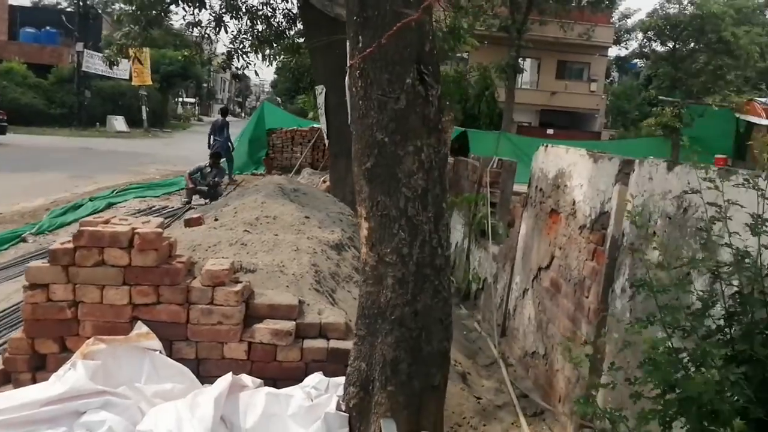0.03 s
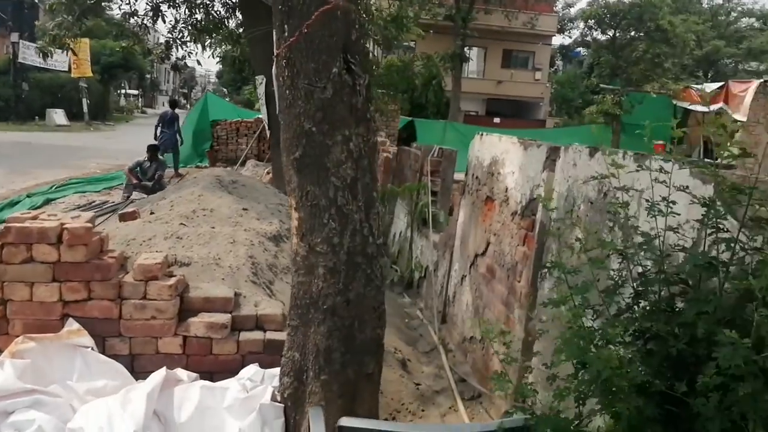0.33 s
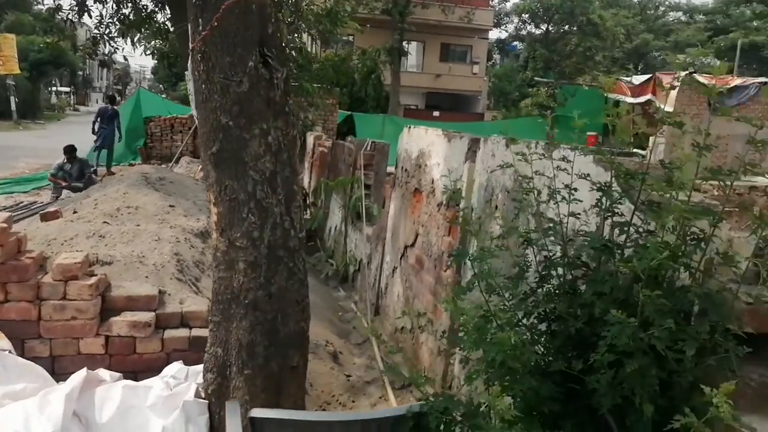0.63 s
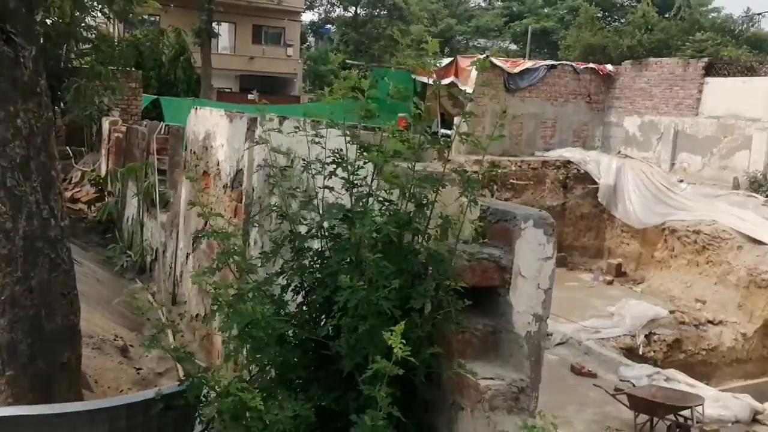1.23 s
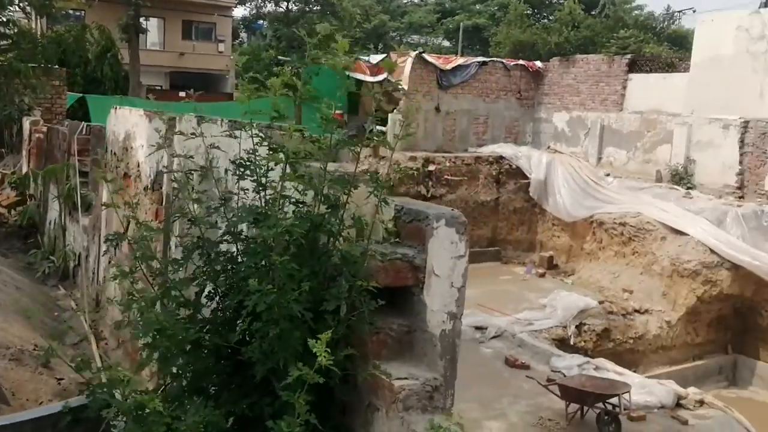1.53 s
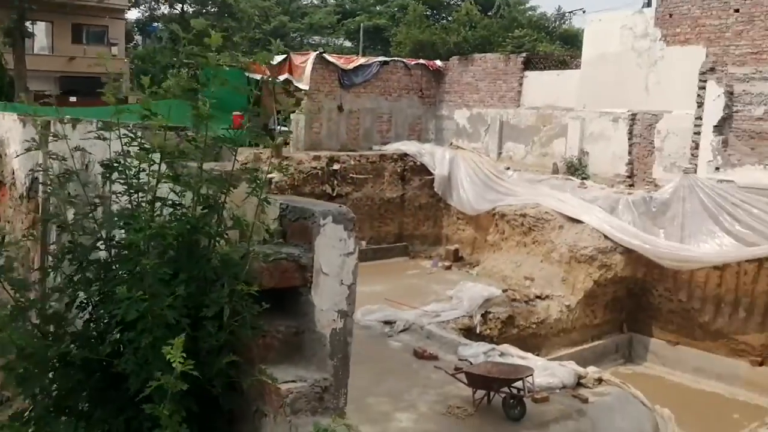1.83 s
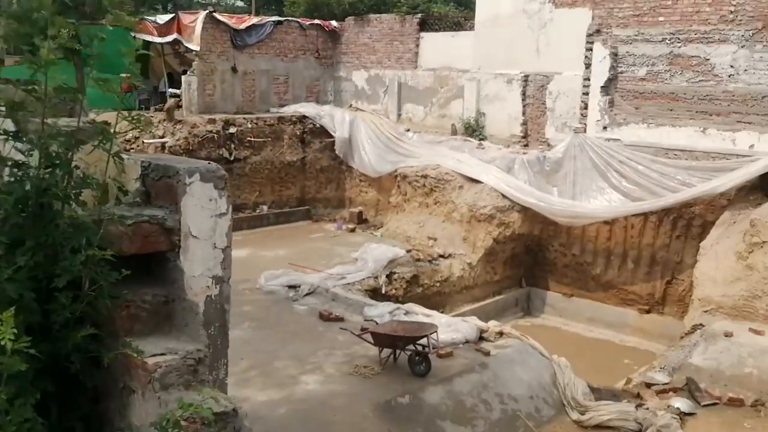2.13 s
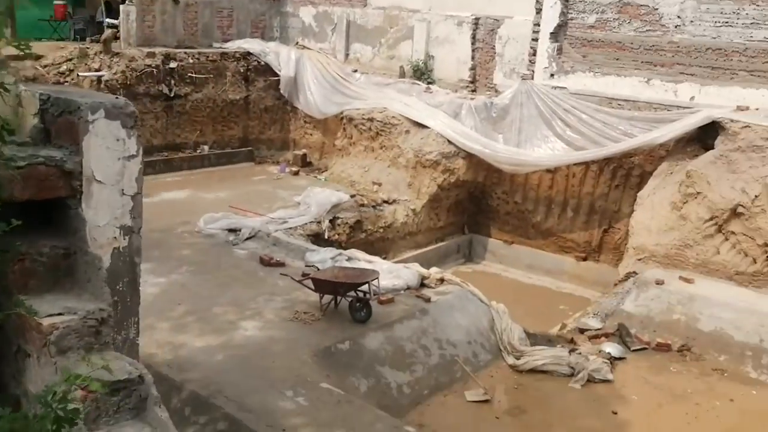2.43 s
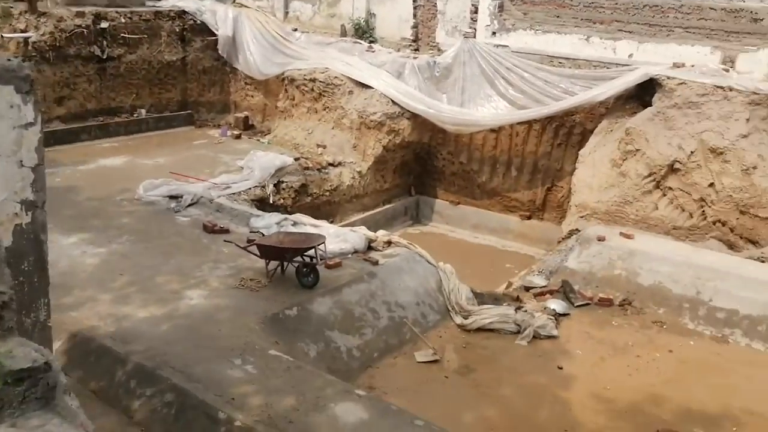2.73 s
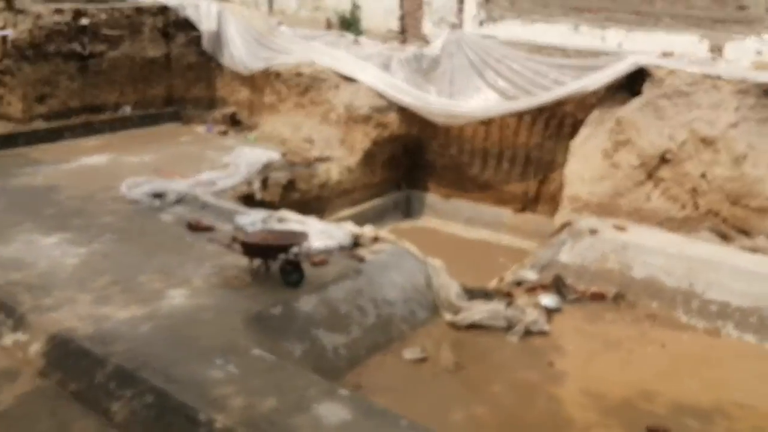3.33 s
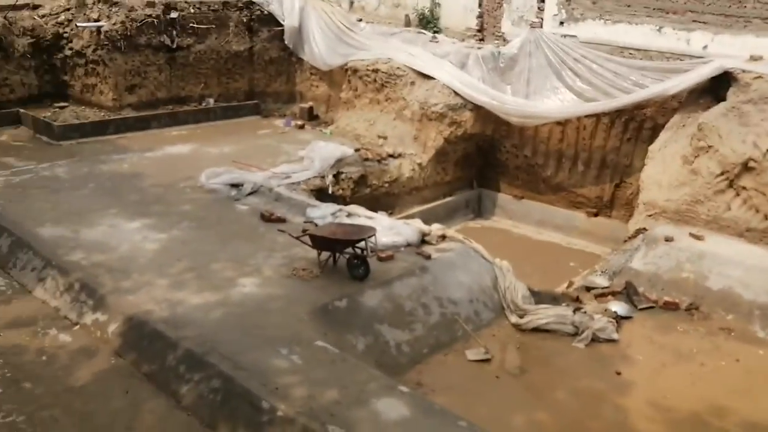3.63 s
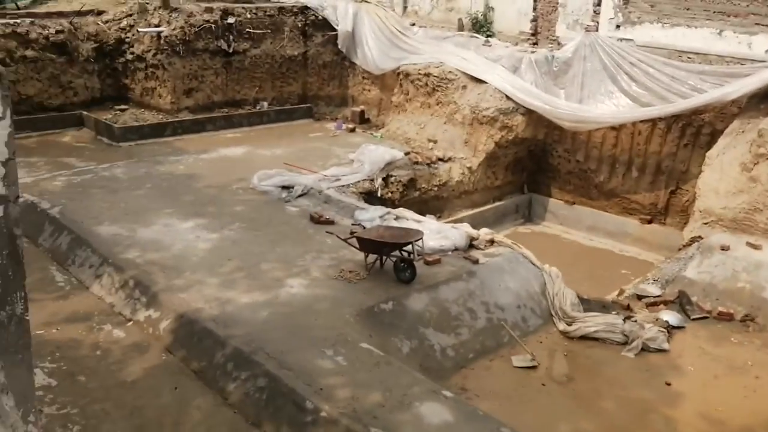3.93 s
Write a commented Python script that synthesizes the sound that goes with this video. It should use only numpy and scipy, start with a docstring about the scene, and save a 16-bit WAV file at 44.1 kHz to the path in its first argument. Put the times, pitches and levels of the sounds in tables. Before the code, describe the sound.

At an outdoor building site, a power cutter whirs and whistles up to speed, grazes the material, then grinds on with a shrill hiss as its motor slows slightly. Walls add a short echo over faint distant traffic.

```python
"""On a building site, a hand-held disc cutter spins up, grazes the work at 1.4 s and bites at 1.6 s.
Spinning freely, its motor whirs and its rim whistles. Cutting slows it down, and the grit on the rim
scrapes the same pattern every turn, making the disc and the work ring. Walls scatter the sound.
Traffic and a distant engine rumble underneath, with a few puffs of wind."""
import sys
import numpy as np
from scipy import signal
from scipy.fft import rfft, irfft
from scipy.io import wavfile
from scipy.ndimage import map_coordinates

SR = 44100
rng = np.random.default_rng(int(sys.argv[2]) if len(sys.argv) > 2 else 0)


def digitize_waveform(pressure):
    """Quantize a signal to 16-bit integers and store it at the path in sys.argv[1].

    Rows of a 2-D input are taken as channels; values are limited to [-1, 1].
    """
    field = np.atleast_2d(pressure).T
    bounded = np.clip(field, -1, 1)
    quanta = np.round(bounded * 32767).astype(np.int16)
    wavfile.write(sys.argv[1], SR, quanta)


N = 176400
T = np.arange(N) / SR
HZ = np.fft.rfftfreq(N, 1 / SR)
RIGHT_LAG_S = .00045  # the cutter's sound reaches the right side this much later

# how fast the disc spins: t/s, speed/(turns per second)
DISC_SPEED = [(0, 45), (.1, 61), (.25, 79), (.45, 101), (.7, 113.5), (1, 122.5), (1.3, 127), (1.6, 129.4),
              (1.86, 128.5), (2.14, 125), (2.41, 121.1), (2.7, 116), (2.83, 114.9), (3.11, 113.1),
              (3.35, 110.8), (3.67, 104.3), (3.81, 102.6), (4, 100.9)]


def amp(db):
    """Turn decibels into a number to multiply by."""
    return 10 ** (np.asarray(db) / 20)


def unit(x):
    """Scale a signal to an average size (rms) of 1."""
    return x / np.sqrt(np.mean(x ** 2))


def curve(table):
    """Join a table's rows with straight lines in time, giving one curve per value column."""
    t, *columns = np.array(table, float).T
    return [np.interp(T, t, column) for column in columns]


def pan(db):
    """Left and right gains for a balance, which is the left level minus the right level in dB."""
    return amp(np.array([db / 2, -db / 2]).reshape(2, -1)) / np.sqrt(np.cosh(db * np.log(10) / 10))


def noise():
    """An even hiss (white noise)."""
    return rng.standard_normal(N)


def stereo_noise(gains):
    """A separate hiss for each side, shaped by one gain per frequency."""
    return unit(irfft(rfft(rng.standard_normal((2, N))) * gains, N))


def wander(rate):
    """A smooth random wiggle of size 1 that changes about `rate` times a second."""
    points = rng.standard_normal(int(rate * N / SR) + 3)
    smooth = signal.resample_poly(points, 4, 1)
    return unit(np.interp(T * rate, np.arange(len(smooth)) / 4, smooth))


def ring(x, resonances, wander_db):
    """An object favours the pitches it rings at, its resonances; the level drifts a little."""
    response = sum(amp([[left], [right]]) / (1 + ((HZ - hz) / (0.67 * width)) ** 2) ** 1.355
                   for hz, width, left, right in resonances)
    return unit(irfft(rfft(x) * response, N)) * amp(wander_db * wander(6.81))


def walls(x, echo_db=6.5, fade_s=0.37):
    """The direct sound reaches the left side first; walls add a short wash of echoes."""
    t = T[:SR // 2]
    tails = rng.standard_normal((2, len(t))) * amp(-60 * t / fade_s)
    tails *= amp(echo_db) / np.sqrt(np.sum(tails ** 2, axis=1, keepdims=True))
    direct = np.array([x, np.interp(T - RIGHT_LAG_S, T, x)])
    padded = np.concatenate([x[len(t) - 1:0:-1], x])  # so echoes are there from the start
    echoes = signal.fftconvolve(padded[None], tails, mode="valid", axes=1)
    return (direct + echoes) / np.hypot(1, amp(echo_db))


def traffic(side_db=-8):
    """Traffic makes a low rumble, mostly the same on both sides."""
    # tone of the rumble: f/Hz, relative level/dB
    spectrum = [(20, 0), (55, -5.5), (100, 3.5), (190, -2), (300, -3.5), (480, -6), (800, -8.5),
                (1300, -17), (3000, -16)]
    # loudness of the rumble: t/s, level/dB
    loudness = [(0, -46.5), (1.3, -46.5), (1.9, -48), (3, -50.5), (4, -49)]
    hz, db = np.array(spectrum, float).T
    colour = amp(np.interp(np.log(HZ + 1), np.log(hz), db))
    middle, side = (unit(irfft(rfft(noise()) * colour, N)) for _ in range(2))
    return (middle + amp(side_db) * side * np.array([[1], [-1]])) * amp(curve(loudness)[0])


def distant_engine():
    """An engine hums unevenly, with tones that follow how fast it fires."""
    # firing rate: t/s, f/Hz
    firing = [(0, 129.5), (1, 133.5), (2.3, 135), (3, 139), (4, 148)]
    # loudness of the hum: t/s, level/dB
    loudness = [(0, -42), (.25, -41.5), (.55, -50.5), (.88, -37.5), (1.1, -49), (1.35, -41), (1.6, -50),
                (2.3, -53.5), (2.7, -55), (4, -55.5)]
    # tones in the hum: multiple of the firing rate, relative level/dB
    tones = [(0.831, -7), (1, 3.5), (1.16, -0.5), (1.67, -7.5), (2, -10), (2.3, -13), (2.67, -13.5)]
    cycles = np.cumsum(curve(firing)[0] * (1 + 0.004 * wander(18))) / SR
    hum = sum(amp(db + 2.3 * wander(12.7)) * np.sin(2 * np.pi * (multiple * cycles + rng.random()))
              for multiple, db in tones)
    return unit(hum) * amp(curve(loudness)[0])


def wind(top_hz=85):
    """Puffs of wind hit the microphone with a deep rumble."""
    # puffs: strongest at t/s, time to swell or fade/s, level/dB
    puffs = [(0.262, 0.11, -45.5), (0.874, 0.076, -39.5), (1.37, 0.075, -51)]
    gusts = sum(amp(db) * np.exp(-((T - at) / length) ** 2) for at, length, db in puffs)
    return stereo_noise(1 / (1 + (HZ / top_hz) ** 4)) * gusts


def motor(turns, throb=0.26, sputter_db=2.5, sputter_s=0.9):
    """Fan noise rings the housing and the electric brushes hiss above it; both throb once a turn."""
    # motor whir: t/s, level/dB, balance/dB
    whir = [(0, -33.5, -3.5), (.3, -34.5, 3), (.6, -35.5, -2), (1, -36.5, -4.5), (1.4, -33.5, -6.5),
            (1.7, -43.5, -6), (2.2, -40.5, 7.5), (4, -43.5, -15)]
    # resonances of the housing: f/Hz, width/Hz, left/dB, right/dB
    housing = [(852, 363, -14, -13.5), (1573, 290, -15.5, -19.5), (1870, 210, -6, -5), (2024, 220, -8, 1.5),
               (2610, 1380, -16.5, -9.5), (3260, 635, -12, -3.5)]
    # peaks in the brush hiss: f/Hz, width/Hz, left/dB, right/dB
    brush_peaks = [(7400, 500, -20, -8), (8314, 420, 2, -5.5), (9740, 770, -9, -16),
                   (12900, 640, -40, -24.5), (13800, 820, -44, -24)]
    db, balance = curve(whir)
    air = walls(noise()) * (1 + throb * np.cos(2 * np.pi * turns)) * amp(0.89 * wander(39.8))
    sparks = air * amp(sputter_db * wander(400) * np.exp(-T / sputter_s))  # sputter at the start
    fan = ring(air, housing, wander_db=1.1)
    brushes = ring(sparks, brush_peaks, wander_db=2.1) * amp(-2 - 2 * T)  # lose 2 dB a second to the fan
    return (fan + brushes) * amp(db) * pan(balance)


def rim_rush(turns, throb=0.16, speed_multiple=56.46, spread=0.21):
    """Air rushing round the rim climbs in pitch with the speed and wakes one resonance after another."""
    # resonances it sweeps through: f/Hz, width/Hz, left/dB, right/dB
    resonances = [(3225, 210, -7, -8.5), (4740, 310, -10, -4.5), (5040, 220, -13, -2), (5790, 880, -26, -2),
                  (6100, 1430, -10.5, 3.5), (7410, 470, -10, -14)]
    # the rush as the microphone turns away: t/s, level/dB, balance/dB
    loudness = [(0, -19, -1), (.09, -17.5, -4), (.17, -27.5, -2), (.27, -21.5, 6.5), (.4, -29, 7),
                (.6, -30, 3.5), (.85, -32, -0.5), (1.2, -26.5, -7), (1.55, -25.5, -8), (2, -25.5, -22),
                (4, -51, -11)]
    centre_hz = speed_multiple * curve(DISC_SPEED)[0]
    db, balance = curve(loudness)
    air = walls(noise()) * (1 + throb * np.cos(2 * np.pi * turns))
    rush = 0
    for hz, width, left, right in resonances:
        strength = np.hypot(amp(left), amp(right)) / 2
        closeness = 1 / (1 + (np.log(hz / centre_hz) / spread) ** 2) ** 2
        rush += ring(air, [(hz, width, left, right)], wander_db=-0.3) * strength * closeness
    return rush * amp(db) * pan(balance)


def rim_whistle(width_hz=110):
    """The rim's airy whistle is a narrow band of noise that climbs as the disc spins up."""
    # path of the whistle: t/s, f/Hz, level/dB, balance/dB
    glide = [(.02, 3100, -46, -4), (.08, 3230, -35, -7), (.13, 3350, -47, 0), (.15, 4620, -46, -1),
             (.22, 4740, -36.5, 2), (.28, 4900, -31, -5), (.37, 4990, -34, -5), (.44, 5400, -41, -6),
             (.6, 5800, -39, -3), (.8, 6215, -38, -5), (1.1, 6330, -39, -6), (1.5, 6400, -56, -9)]
    hz, db, balance = curve(glide)
    offset = np.fft.fftfreq(N, 1 / SR) / width_hz
    band = np.fft.ifft(np.fft.fft(walls(noise())) / (1 + offset ** 2))
    whistle = np.real(band * np.exp(2j * np.pi * np.cumsum(hz) / SR))  # move the band up to its pitch
    return unit(whistle) * amp(db) * pan(balance)


def whine(turns, blur=0.0021, flutter_db=3.0):
    """Fluttering tones follow the speed; most swell and fade, while a few start or stop abruptly."""
    # tones: multiple of the disc speed, start/s, bend of the swell/s, end/s, level/dB, balance/dB
    tones = [(1.98, 0.37, 1.4, 1.7, -49.5, 13), (2.99, 0.28, 1.16, 2.07, -50, -1),
             (12.03, 3.28, 4, 5.1, -45.5, -4), (18, 2.73, 2.9, 3.4, -39, -6.5),
             (21, 1.62, 1.75, 1.88, -35, -8), (21.8, 1.56, 1.73, 2, -33, -11),
             (22, 2.5, 2.16, 2.3, -47, -2), (24.3, 2.55, 2.84, 3.05, -40, -7),
             (24, 3.1, 3.25, 3.42, -38, -5), (26, 3.5, 3.74, 3.8, -42, -6), (32, 3.35, 3.5, 3.75, -40, -9),
             (36, 1.6, 2.5, 2.16, -31, -9), (38.1, 2.0, 2.31, 2.6, -31.5, -4.5),
             (41, 2.8, 3.12, 3.35, -35, -6), (45, 3.7, 3.9, 4.2, -33, -8.5), (46, 1.7, 1.82, 2.2, -22, -13),
             (57, 3.65, 3.75, 3.77, -24, -13), (62.4, 0.35, 0.65, .8, -41.5, -1),
             (62.6, 0.8, 0.72, 1.16, -38, 0)]
    speed = curve(DISC_SPEED)[0]
    shaft_turns = turns + np.cumsum(blur * speed * wander(100)) / SR
    lag_turns = np.outer([0, RIGHT_LAG_S], speed)
    out = np.zeros((2, N))
    for multiple, start, bend, end, db, balance in tones:
        on = (T > start) & (T < end)  # a row that ends before it starts is silent
        swell = np.interp(T[on], [start, bend, end], [0, 1, 0]) * amp(db + flutter_db * wander(30)[on])
        cycles = multiple * (shaft_turns[on] - lag_turns[:, on]) + rng.random()
        out[:, on] += swell * np.sin(2 * np.pi * cycles) * pan(balance)
    return out


def snaps(decay_s=0.0031):
    """Short, bright snaps: the motor crackles while spinning up, then the disc ticks against the work."""
    # snaps: t/s, level/dB, f/Hz, width/Hz
    events = [(.027, -36, 8500, 900), (.117, -27, 7460, 1500), (.2, -28, 8450, 900),
              (0.278, -28, 9100, 900), (1.465, -28, 5860, 900), (1.521, -20.5, 10200, 1100),
              (1.737, -25, 5860, 900)]
    out = np.zeros((2, N))
    for start, db, hz, width in events:
        burst = stereo_noise(1 / (1 + ((HZ - hz) / width) ** 2))
        out += burst * amp(db) * (T >= start) * np.exp(-np.abs(T - start) / decay_s)
    return out * pan(-4)


def rim_grit(turns, wear=0.051, points=384):
    """The grit scrapes nearly the same pattern each turn, as wear renews a small share of the rim."""
    bumps = rng.standard_normal((int(turns[-1]) + 2, points))  # one row per turn
    spectrum = rfft(signal.lfilter([1], [1, -(1 - wear)], bumps, axis=0))
    pattern = irfft(spectrum / np.abs(spectrum), points)  # all overtones equally strong
    return unit(map_coordinates(pattern.ravel(), [turns * points], order=3))


def cutting(turns, wobble=0.049, grit_hz=1500, chatter_hz=59.33):
    """Scraping grit makes the disc and the work ring, while the disc wobbles and chatters."""
    # resonances of disc and work, in eight bands from low to high: f/Hz, width/Hz, left/dB, right/dB
    low = [(1780, 104, -10.5, -6), (2078, 540, -4.5, 2.5)]
    disc = [(2700, 214, -2.7, 0)]
    body = [(3170, 400, -23, -4), (3550, 360, -6, 3.5)]
    edge = [(4622, 277, -7.5, 0)]
    middle = [(5300, 530, -12, -4.5), (5775, 360, -10, 2), (6430, 960, -31, -8.5)]
    upper = [(7205, 560, -1, 0)]
    sizzle = [(8910, 750, 0, -8)]
    high = [(10220, 710, -2.5, -10.5), (11820, 470, -10.5, -15), (13800, 3200, -18.5, -18.5)]
    # loudness of the cut: t/s, then level/dB for each band
    loudness = [(.4, -73, -76, -73, -75, -48.5, -68, -75, -71),
                (1.36, -64, -66, -59, -60, -39, -56, -67, -58),
                (1.44, -62, -55, -54, -53, -33, -42, -48, -38),
                (1.57, -56, -54, -51, -53, -37, -59, -47, -39.5),
                (1.66, -43.5, -46, -42.5, -46, -27, -41, -34, -36),
                (1.83, -46, -44, -43, -41, -27, -40, -37, -38),
                (1.86, -47, -48, -44.5, -38, -28, -43, -38.5, -37.5),
                (2, -41.5, -42, -41.5, -34, -28, -45, -35.5, -36),
                (2.25, -47, -43.5, -42, -37.5, -28, -41, -35.5, -34.5),
                (2.42, -46, -43, -42.5, -37.5, -27.5, -45, -36.5, -36.5),
                (2.6, -43.5, -42, -42.5, -40, -29.5, -43, -37, -36),
                (2.85, -43.5, -43.5, -44, -38.5, -29.5, -40.5, -38, -33),
                (3.05, -44, -49, -43, -41.5, -29, -37.5, -35.5, -35.5),
                (3.25, -45.5, -43.5, -45.5, -39, -29.5, -35.5, -34.5, -35),
                (3.55, -48, -48, -41, -40.5, -31, -39.5, -31, -34.5),
                (3.78, -44.5, -45.5, -43.5, -36, -30, -41.5, -37.5, -37),
                (4, -46, -53, -44.5, -40, -30.5, -41, -35.5, -33.5)]
    # roughness, one row per band: share that repeats each turn, grit flicker/dB, chatter/dB
    texture = [(0.37, 0.3, 1), (0.66, -1.5, 1.6), (0.49, 0.6, .5), (0.44, -1.3, 0.5), (0.3, 0.4, 0.67),
               (0.46, 2, 1.5), (0.43, 2, 0.84), (0.55, 1.5, 1)]
    # where the cut is heard: t/s, balance/dB
    balance = [(1.5, -3.5), (2.2, 0), (3, -1), (4, -2.5)]
    bands = low, disc, body, edge, middle, upper, sizzle, high
    repeating, fresh = walls(rim_grit(turns)), walls(noise())
    pressure = 1 + wobble * (np.cos(2 * np.pi * turns) + np.cos(4 * np.pi * turns))
    out = 0
    for band, db, (share, grit_db, chatter_db) in zip(bands, curve(loudness), texture):
        scrape = np.sqrt(share) * repeating + np.sqrt(1 - share) * fresh
        roughness = pressure * amp(grit_db * wander(grit_hz) + chatter_db * wander(chatter_hz))
        out += ring(scrape * roughness, band, wander_db=0.1) * amp(db)
    return out * pan(curve(balance)[0])


def scene():
    """The disc cutter over the sounds of the street."""
    turns = np.cumsum(curve(DISC_SPEED)[0]) / SR  # turns made so far
    spinning = motor(turns) + rim_rush(turns) + rim_whistle() + whine(turns)
    return spinning + cutting(turns) + snaps() + traffic() + distant_engine() + wind()


def record(dry, top_hz=15500):
    """The recorder cuts off the highest treble."""
    return signal.sosfilt(signal.ellip(10, .2, 80, top_hz, fs=SR, output="sos"), dry)


dry = scene()
out = record(dry)
digitize_waveform(out)
```